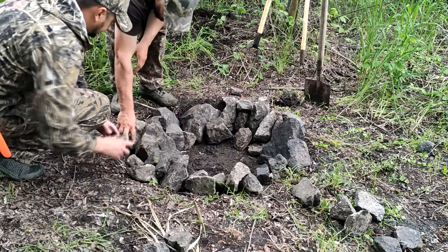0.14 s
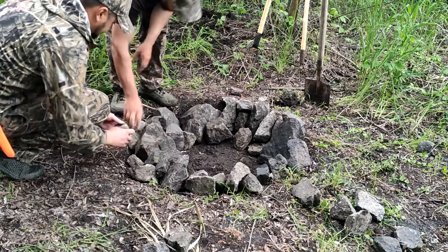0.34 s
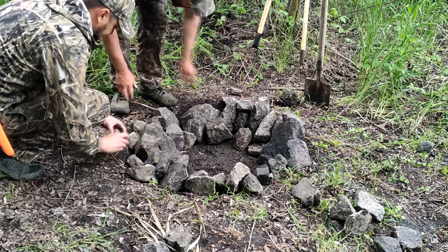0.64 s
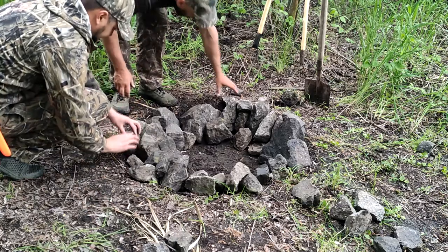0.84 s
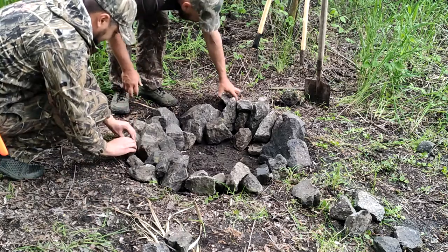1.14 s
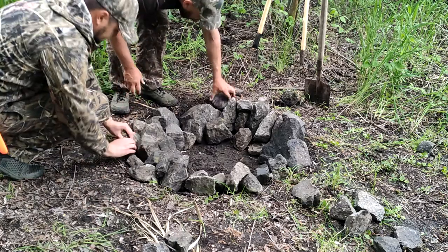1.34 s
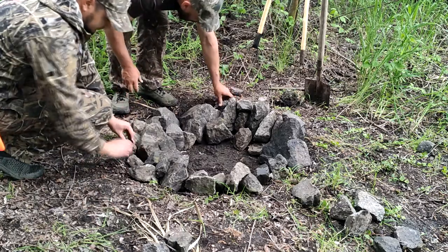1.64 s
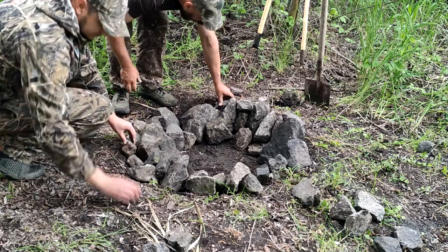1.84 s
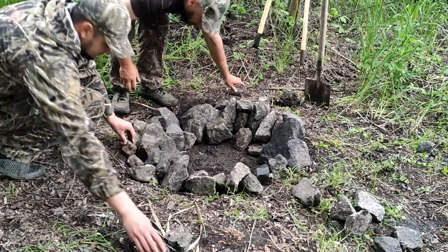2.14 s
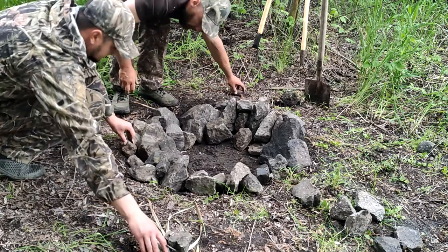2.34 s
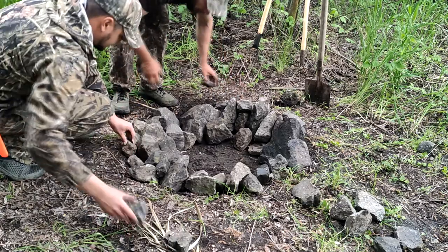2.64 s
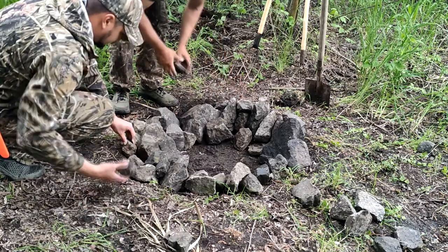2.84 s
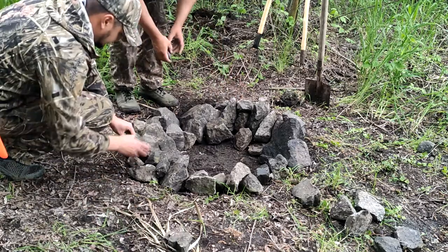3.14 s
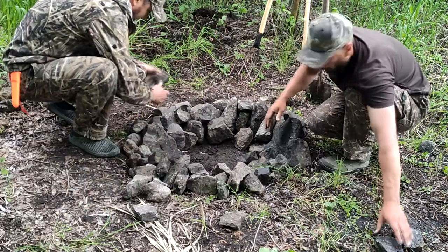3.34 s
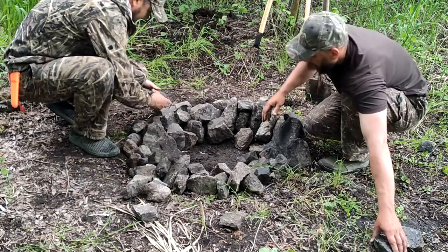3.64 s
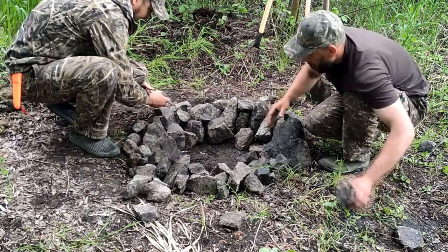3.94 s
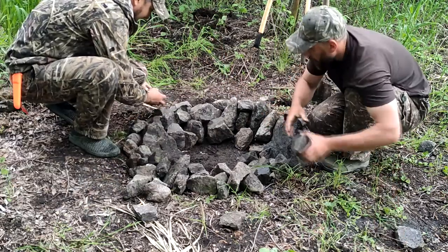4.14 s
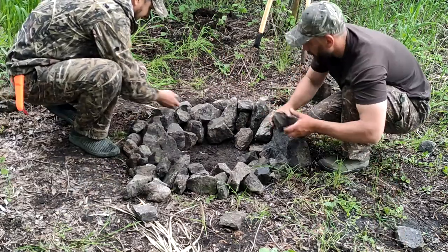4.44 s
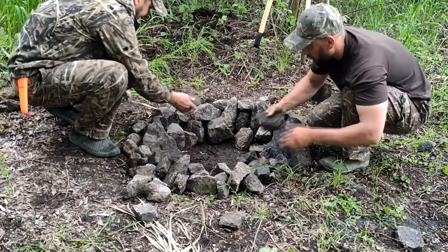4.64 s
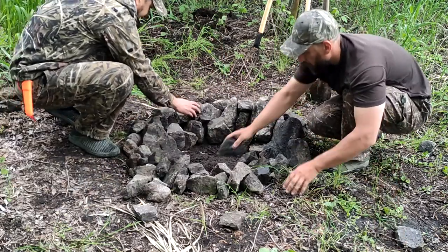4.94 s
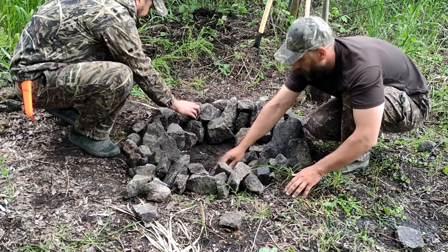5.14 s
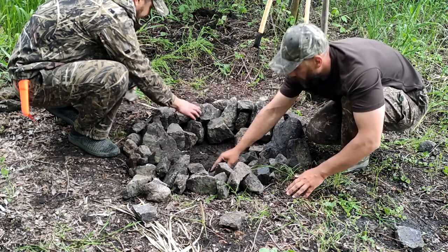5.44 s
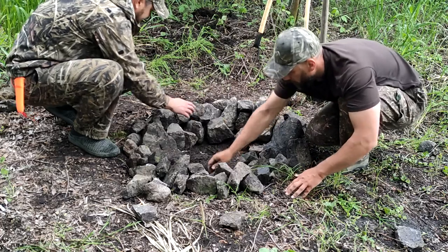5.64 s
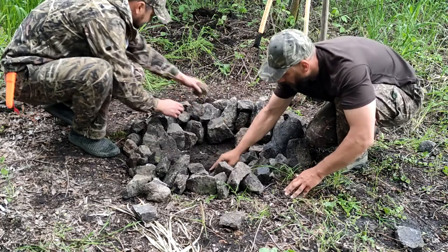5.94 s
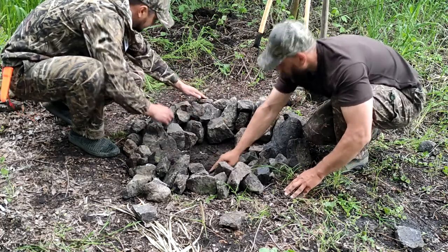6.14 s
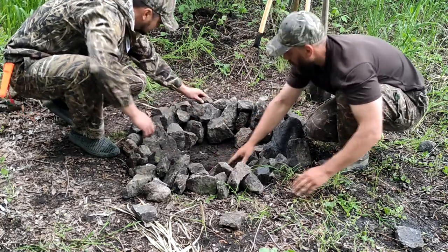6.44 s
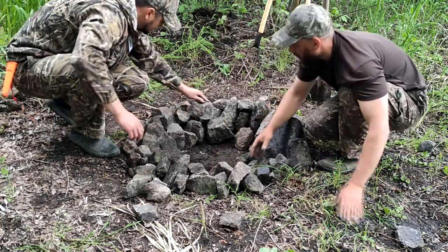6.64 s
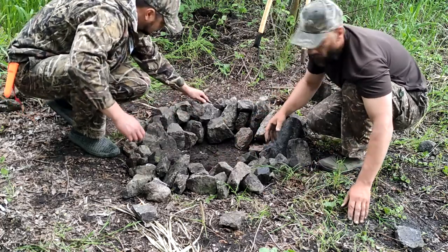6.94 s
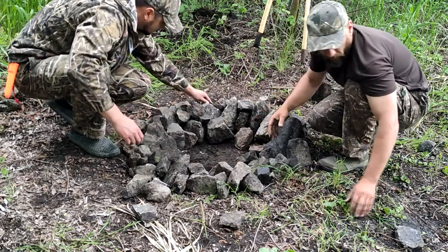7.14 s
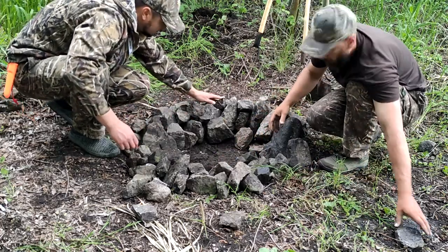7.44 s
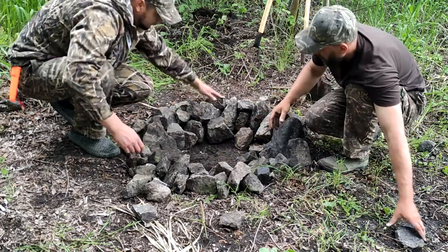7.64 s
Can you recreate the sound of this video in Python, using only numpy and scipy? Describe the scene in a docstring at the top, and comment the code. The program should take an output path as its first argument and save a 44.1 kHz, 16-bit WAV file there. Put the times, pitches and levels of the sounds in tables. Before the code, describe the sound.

Over a quiet outdoor hush, distant birds chirp while heavy stones knock together in uneven bouts, one sharp clatter, then fainter knocks and scrapes.

```python
"""Outdoors, over a quiet hush and fine rustling, a distant bird chirps and others twitter as rocks begin to knock.
Rocks for a fire ring clatter in two bouts in the first two seconds; after a pause come lighter knocks and a scrape.
Then the hardest clatter rings out, a rock drops on the soil and is dragged, and knocks and scrapes grow fainter.
Each knock is a short dull ring of filtered impulses, thrown back by ground, stones and trees as noise tails;
scrapes and rustle are coloured random grains, soil thumps low filtered bursts, birds gliding sines."""
import sys
import numpy as np
from scipy import signal
from scipy.fft import rfft, irfft, next_fast_len
from scipy.io import wavfile
from scipy.ndimage import uniform_filter1d, map_coordinates

SR = 44100
rng = np.random.default_rng(int(sys.argv[2]) if len(sys.argv) > 2 else 0)


def generate_wav(signal):
    """Clip the signal to [-1, 1] and save it as 16-bit WAV at the path in sys.argv[1]."""
    frames = np.transpose(np.atleast_2d(signal))
    scaled = np.clip(frames, -1, 1) * 32767
    pcm = np.round(scaled).astype(np.int16)
    wavfile.write(sys.argv[1], SR, pcm)


N = 343528
SIZE = 4096  # samples in one short sound
HZ = np.fft.rfftfreq(SIZE, 1 / SR)
TIME = np.arange(N) / SR

# drags of a rock into its seat: start t/s, length/s, rasp level/dB, soil scuff level/dB, soil rumble level/dB
SCRAPE_STROKES = [(3.636, 0.05, -68.5, -80, -71), (4.83, 0.062, -55, -65, -59),
                  (5.036, 0.43, -74.5, -70.5, -61.5), (5.438, 0.32, -80, -72, -60.5),
                  (6.536, 0.043, -52, -63, -64), (6.611, 0.11, -66.5, -63, -63),
                  (6.715, 0.098, -65.5, -59.5, -62), (7.035, 0.06, -58, -57.5, -59.5)]
# colour of the soil under a weight: f/Hz, relative level/dB
SOIL_COLOUR = [(30, -29), (60, -14), (90, 6), (115, -3), (160, 0), (210, -4), (300, -32), (700, -40),
               (2000, -92.5)]


def amp(db):
    """Decibels to an amplitude factor."""
    return 10 ** (np.asarray(db) / 20)


def unit(x):
    """The signal or response brought to rms 1."""
    return x / np.sqrt(np.mean(x ** 2) + 1e-20)


def along(points, hz):
    """A curve through (f/Hz, value) points, straight on a log frequency axis."""
    f, v = np.transpose(points)
    return np.interp(np.log(hz + 1), np.log(f), v)


def filtered(x, response):
    """The signal with its spectrum multiplied by a response of frequency."""
    n = x.shape[-1]
    m = next_fast_len(n + 2 * SIZE)
    spectrum = rfft(x, m) * response(np.fft.rfftfreq(m, 1 / SR))
    return irfft(spectrum, m)[..., :n]


def coloured(x, colour):
    """The signal through a (f/Hz, level/dB) colour, at rms 1."""
    return unit(filtered(x, lambda hz: amp(along(colour, hz))))


def causal(gain):
    """The sharpest causal response with this gain: the cepstrum is folded onto positive time."""
    cepstrum = irfft(np.log(gain + 1e-6))
    cepstrum[1:SIZE // 2] *= 2
    cepstrum[SIZE // 2 + 1:] = 0
    return np.exp(rfft(cepstrum))


def add(track, s, sound):
    """Mix a sound into the track at time s."""
    part = track[:, max(round(s * SR), 0):][:, :sound.shape[-1]]
    part += sound[..., :part.shape[1]]


def pair(alike, size):
    """Two noises whose left-right likeness follows (f/Hz, likeness) points, clipped to 0-1."""
    def turn(hz):
        return np.arccos(np.clip(along(alike, hz), 0, 1)) / 2

    def mid_and_side(hz):
        return np.array([np.cos(turn(hz)), np.sin(turn(hz))])

    mid, side = filtered(rng.standard_normal((2, size)), mid_and_side)
    return np.array([mid + side, mid - side])


def burst(t60, attack):
    """A dense cloud of reflections that swells over attack s and dies by 60 dB in t60 s, of energy 1."""
    t = np.arange(SIZE) / SR
    envelope = amp(-60 * t / t60) * (1 - np.exp(-(t / attack) ** 2))
    cloud = pair([(1000, 0.94), (3000, 0.264), (8000, 0.11)], SIZE) * envelope
    return unit(cloud) / np.sqrt(SIZE)


def grains(rate, alike):
    """Random tiny impulses of uneven size, rate a second, in two ears."""
    hits = (rng.random(N) < rate / SR) * np.sqrt(rng.exponential(size=N))
    return hits * pair([(1000, alike)], N)


def wobble(rate):
    """A smooth random curve, rate knots a second."""
    return map_coordinates(rng.standard_normal(int(N * rate / SR) + 4), [TIME * rate])


def stones():
    """Every contact rings and crushes grit, and is thrown back by the ground, the other stones and the trees."""
    # knocks of stone on stone: t/s, clack energy/dB, clack pitch f/Hz, top of the blow f/Hz,
    # thud over clack/dB, bite over clack/dB
    contacts = [(0.2546, -36, 1620, 2600, -5.5, -7), (0.7505, -29.5, 1700, 2400, -12, -16),
                (.907, -10, 1460, 3100, -3.5, -18), (0.9219, -10.5, 1550, 3100, -3, -7),
                (0.9319, -9, 1240, 2400, -7, -24), (0.9499, -20.5, 1290, 2400, 2, -18),
                (0.9875, -34.5, 1150, 2200, 8, -18), (1.4803, -14.5, 1600, 2670, -5, -25),
                (1.5075, -12, 1560, 1980, -2.5, -24), (1.5693, -29, 1500, 2100, 3.5, -18),
                (3.697, -38.5, 1150, 2600, -3, -14), (3.717, -39, 2100, 2600, -3, -15),
                (3.735, -40.5, 2200, 2600, -5, -12), (3.98, -25.5, 1400, 2600, -12, -20),
                (4.809, -6, 1500, 2500, -14, -13.5), (4.827, -3, 1380, 2500, -17, -23),
                (4.8375, 7, 1450, 2520, -6, -13.5), (4.8617, -11, 1410, 2400, -10, -30),
                (4.8732, -13, 1420, 2400, -22, -28), (4.8907, -30, 1200, 2400, -7, -22),
                (4.9035, -15.5, 1430, 2400, 2, -15), (4.9063, -15, 1400, 2400, -11, -21),
                (4.929, -24, 1300, 2400, -9, -22), (4.9385, -18, 1220, 2200, 5.5, -20),
                (4.9603, -19.5, 1274, 2200, 5, -22), (5.16, -26, 1510, 2400, -7, -11),
                (5.1621, -8, 1130, 2400, -4.5, -20), (5.1712, -20.5, 1210, 2400, 2, -19),
                (5.4501, -26.5, 1470, 2600, 1, -8), (5.4575, -43, 950, 1500, 17.5, -23),
                (5.504, -43.5, 950, 1500, 8, -25), (5.622, -40, 1000, 1400, 3, -25),
                (5.629, -34.5, 1150, 1450, -1, -25), (6.0234, -40.5, 1050, 1510, 11.5, -17.5),
                (6.0537, -2, 1704, 2400, -23.5, -13), (6.5412, -20, 2030, 2800, -3, -0.5),
                (6.5586, -24.5, 1402, 2210, -0.5, -16), (6.564, -23, 1950, 2600, -12, -7),
                (6.6782, -21.5, 1590, 2400, -15, -22), (6.714, -19, 1680, 2400, -11, -27),
                (6.727, -28, 1550, 2300, -1, -20), (6.741, -34, 1700, 2700, 0, -12),
                (6.75, -32, 1600, 2300, -1, -17), (6.815, -37, 1650, 2400, -2, -14),
                (7.0364, -34, 1650, 2000, 0, -15), (7.0534, -30.5, 1600, 2200, -9.5, -28),
                (7.104, -31.5, 1560, 2100, 1, -17), (7.523, -43, 2200, 3200, -15, -2),
                (7.731, -38.5, 1300, 1800, -1.5, -27)]
    # where a rock is being set: t/s, clack width setting/Hz, snap pitch f/Hz, snap spread (1 = usual),
    # grit over bite/dB, top of the grit f/Hz, right-ear lag/s, ground echo delay/s, ground echo share,
    # scatter off other stones/dB, trees/dB
    places = np.array([(.92, 860, 3420, 1.1, -2.5, 19000, 0.00012, 0.003, 0.49, -5.5, -12),
                       (1.5, 710, 3500, 1.8, 0.5, 11500, .000023, .0024, 0.26, -9.5, -10),
                       (3.9, 1000, 4000, 1, -6, 12000, .00002, .00172, .7, -9, -9),
                       (4.84, 716, 3220, 1.1, -22.5, 12000, 0.000044, 0.0017, 0.37, -10.5, -16.5),
                       (5.16, 537, 3240, 0.52, 10.5, 12300, 0.000038, 0.0037, 0.12, -2.5, -10.5),
                       (5.5, 890, 2420, 0.26, -15, 11000, .000012, 0.0014, .2, -7.5, -5.5),
                       (6.05, 437, 4270, 0.5, -12.5, 9300, 0.000016, 0.00115, 0.12, -10, -11),
                       (6.55, 980, 3700, 0.97, -26, 11000, 0.0000098, 0.0025, 0.11, -5.5, -6),
                       (6.75, 557, 2590, .8, 3.5, 11000, .000012, .002, 0.19, -3, -8.5)])
    # colour of crushed grit: f/Hz, relative level/dB
    grit_colour = [(3000, -42.5), (5500, -12.5), (6500, -5), (7500, -25), (8700, -1.5), (9700, -5),
                   (10500, 0.5), (11200, -13), (12700, 1), (15500, -6), (18000, -41.5)]
    out = np.zeros((2, N))
    # the trees face every side of a rock, so they also return a broader band than the direct ring
    broad_band = 1 / np.sqrt((1 + (HZ / 3700) ** 10) * (1 + (600 / (HZ + 1)) ** 4))
    broad = irfft(causal(unit(broad_band)))
    for s, db, pitch, blow_hz, thud_db, bite_db in contacts + catches():
        nearest = places[np.argmin(abs(places[:, 0] - s))]
        _, width, snap_hz, snap_spread, grit_db, grit_hz, lag, delay, share, scatter_db, trees_db = nearest
        ears = np.exp(-2j * np.pi * HZ * np.array([[0], [abs(lag)]]))
        ring = stone_ring(pitch, width, blow_hz, thud_db, bite_db, snap_hz, snap_spread) * ears
        # the harder the bite, the brighter the snap and the more grit is crushed, over a few milliseconds
        grain = unit(amp(along(grit_colour, HZ)) / np.sqrt(1 + (HZ / grit_hz) ** 10))
        grit = amp(bite_db + grit_db) * causal(grain) * rfft(burst(t60=0.0034, attack=0.00021))
        ground = (1 + share * np.exp(-2j * np.pi * HZ * delay)) / np.sqrt(1 + share ** 2)
        scatter = amp(scatter_db) * rfft(burst(t60=0.027, attack=0.0019))
        # soft soil swallows the grit's treble, so only the ring bounces off it
        hit = amp(db) * irfft(ring * (ground + scatter) + grit * (1 + scatter))
        add(out, s, hit)
        for sent in hit, amp(db - 5.0) * broad[None]:
            add(out, s, amp(trees_db) * signal.fftconvolve(sent, trees(), axes=1))
    return out


def stone_ring(pitch, width, blow_hz, thud_db, bite_db, snap_hz, snap_spread):
    """A rock's heavily damped ring, with a hollow thud below it and a hard snap above it."""
    # colour of the hollow thud: f/Hz, relative level/dB
    thud_colour = [(60, -44), (250, -11), (330, -3), (400, 1), (520, 3), (740, 0), (1000, -1),
                   (2000, -49.5), (4000, -90.5)]
    # colour of the hard snap: multiple of the snap pitch, relative level/dB
    snap_shape = [(.4, -49), (.62, -10.5), (.82, -2.5), (1, -8), (1.13, -5.5), (1.3, -15.5), (1.7, -31),
                  (2.2, -38), (4, -74.5)]
    # a softer blow cuts the ring off lower
    blow = 1 / np.sqrt(1 + (HZ / blow_hz) ** 10)
    # the resonance is 6 dB down across 1.21 times the width setting
    detune = (HZ ** 2 - pitch ** 2) / ((HZ + 1) * width * 1.21)
    clack = unit(blow / (1 + detune ** 2))
    thud = amp(thud_db) * unit(amp(along(thud_colour, HZ)))
    snap_colour = [(snap_hz * ratio ** snap_spread, db) for ratio, db in snap_shape]
    snap = amp(bite_db + 0.5) * unit(amp(along(snap_colour, HZ)))
    return causal(np.sqrt(clack ** 2 + thud ** 2 + snap ** 2))


def catches():
    """A dragged rock catches on edges at uneven moments: faint knocks that grow with the rasp."""
    every_s, over_rasp_db, spread_db = 0.016, 17.5, 5
    pitch_hz, blow_hz, thud_db, bite_db = 1600, 2200, 0, -18
    knocks = []
    for start, length, rasp_db, _, _ in SCRAPE_STROKES:
        count = max(round(length / every_s), 1)
        for k, (when, force, edge) in enumerate(rng.uniform(-1, 1, (count, 3))):
            s = start + length * (k + .5 + when / 2) / count
            energy_db = rasp_db + over_rasp_db + spread_db * force
            knocks.append((s, energy_db, pitch_hz * (1 + 0.11 * edge), blow_hz, thud_db, bite_db))
    return knocks


def pings():
    """Short pings and narrow bands of noise sound with the hard knocks, each around one pitch."""
    # pings, the lowest a rock's own ring: t/s, pitch f/Hz, width/Hz, energy/dB, t60/s
    tones = [(4.828, 13400, 1100, -28, .03), (5.161, 9250, 130, -16, 0.011), (5.161, 4330, 30, -24.5, .025),
             (5.162, 2760, 30, -33, 0.028), (6.054, 1750, 20, -16.5, 0.02)]
    out = np.zeros((2, N))
    t = np.arange(SIZE) / SR
    for s, hz, width, db, t60 in tones:
        # a random walk of the phase widens the tone into a band
        wander = np.cumsum(np.sqrt(2 * np.pi * width / SR) * rng.standard_normal((2, SIZE)), axis=1)
        envelope = amp(-60 * t / t60) * (1 - np.exp(-t / 0.00034))
        ping = np.sin(2 * np.pi * hz * t + wander) * envelope
        ping = amp(db) * unit(ping) / np.sqrt(SIZE)
        add(out, s, ping)
        add(out, s, amp(-5.0) * signal.fftconvolve(ping, trees(), axes=1))
    return out


def soil():
    """The ground takes a rock's weight with a low, soft thump and a short cloud of reflections."""
    # weight landing on the soil: t/s, energy/dB
    thumps = [(0.76, -28), (0.923, -21), (4.839, -23.5), (5.162, -14.5), (5.452, -22), (6.056, -20)]
    out = np.zeros((2, N))
    body = causal(unit(amp(along(SOIL_COLOUR, HZ))))
    for s, db in thumps:
        thump = irfft(body * (1 + amp(-7.5) * rfft(burst(t60=0.075, attack=0.0055))))
        add(out, s, amp(db) * unit(thump) / np.sqrt(SIZE))
    return out


def scrapes():
    """Rough faces catch and slip while a rock is pushed home; the soil scuffs and rumbles under it."""
    # colour of stone rasping on stone: f/Hz, relative level/dB
    rasp_colour = [(150, -9.5), (300, -0.5), (430, -2), (800, 3), (1300, 1), (1600, 1.5), (1760, 11.5),
                   (2000, -24), (2600, -19.5), (12000, -35.5)]
    # colour of the scuffed soil: f/Hz, relative level/dB
    scuff_colour = [(120, -22.5), (280, -5), (430, 5.5), (620, -5.5), (850, -14.5), (1500, -26.5),
                    (4000, -58.5)]
    rasp, scuff, rumble = np.zeros((3, N))
    for s, length, rasp_db, scuff_db, rumble_db in SCRAPE_STROKES:
        stroke = np.exp(-(2 * (TIME - s) / length - 1) ** 4)
        rasp += amp(rasp_db) * stroke
        scuff += amp(scuff_db) * stroke
        rumble += amp(rumble_db) * stroke
    out = rasp * coloured(grains(rate=4800, alike=0.77), rasp_colour)
    out += scuff * coloured(grains(rate=1400, alike=.9), scuff_colour)
    out += rumble * coloured(grains(rate=1800, alike=0.96), SOIL_COLOUR)
    return out


def rustle():
    """Cloth and dry leaves crackle finely all the time, and flare up when an arm sweeps."""
    # quick sweeps of a sleeve or through dry litter: peak t/s, time either side to fall to e^-2/s, level/dB
    brushes = [(1.427, 0.022, -60.5), (2.422, 0.018, -62), (4.322, 0.13, -63.5), (5.506, 0.059, -62.5),
               (6.119, .012, -61)]
    # colour of dry litter and cloth: f/Hz, relative level/dB
    litter_colour = [(1500, -48), (4000, 3), (7200, -4.5), (9000, 6), (10300, 4), (11400, -18),
                     (13000, 2.5), (15500, -7)]
    level_db = treble_db()
    # the crackle swings 1.8 times as wide in dB as the treble
    stirring = amp(level_db.mean() + 1.8 * (level_db - level_db.mean()))
    sweeps = sum(amp(db) * np.exp(-2 * ((TIME - s) / length) ** 2) for s, length, db in brushes)
    return np.hypot(stirring, sweeps) * coloured(grains(rate=14000, alike=0.15), litter_colour)


def unsteady():
    """A smoothed random curve of rms 1, as long as one short sound."""
    smooth = uniform_filter1d(rng.standard_normal(SIZE), size=180)
    return unit(uniform_filter1d(smooth, size=90))


def bird():
    """Each chirp climbs a little, holds and drops away fast; its overtones flutter and the trees blur it."""
    # chirps: middle t/s, top pitch f/Hz, then the level/dB of the first, second, third and fourth partial
    chirps = [(0.156, 1624, -80, -60.5, -66, -80), (.453, 1812, -71, -56, -64, -70.5),
              (.741, 1710, -67, -63.5, -62, -70), (1.139, 1680, -76, -63.5, -59, -67),
              (1.538, 1712, -69, -55.5, -59.5, -66), (2.055, 1690, -67, -58.5, -54.5, -67),
              (2.672, 1510, -66, -69, -62.5, -72), (3.177, 1580, -62.5, -68, -59.5, -76)]
    half_s = .0165
    rise, fall, waver = .1, 0.21, 0.0075  # shares of the top pitch
    flutter_db, upper_db_per_partial = 2.5, -3  # the slope runs from the fourth partial to the sixth
    out = np.zeros((2, N))
    t = np.arange(SIZE) / SR - SIZE / SR / 2
    u = np.clip(t / half_s, -1.5, 1.5)
    sag = np.where(u < 0, rise * u ** 2, fall * abs(u) ** 2.5)
    for s, top_hz, *low_db, upper_db in chirps:
        phase = 2 * np.pi * np.cumsum(top_hz * (1 - sag + waver * unsteady())) / SR
        partials_db = low_db + [upper_db + upper_db_per_partial * k for k in range(3)]
        voice = np.zeros(SIZE)
        for k, db in enumerate(partials_db, 1):
            voice += amp(db + flutter_db * unsteady()) * np.sin(k * phase)
        chirp = voice * np.exp(-u ** 6)
        add(out, s + t[0], chirp)
        add(out, s + t[0], amp(-4.5) * signal.fftconvolve(chirp[None], trees(), axes=1))
    return out


def twitter():
    """Far birds slip thin gliding notes through the trees, whose tail is sent louder than the note."""
    # notes: middle t/s, middle pitch f/Hz, glide/(Hz/s), level/dB ahead of the direct and tree sends
    notes = [(.397, 3440, 11000, -65), (.512, 4100, 6000, -64), (.895, 3600, 13000, -65),
             (.995, 4160, -9000, -66), (1.675, 4320, -16000, -68),]
    note_s = .018  # from the middle to 1/e
    out = np.zeros((2, N))
    t = (np.arange(SIZE) - SIZE / 2) / SR
    for s, hz, glide, db in notes:
        phase = 2 * np.pi * np.cumsum(hz + glide * t) / SR
        note = amp(db) * np.sin(phase) * np.exp(-(t / note_s) ** 2)
        add(out, s + t[0], amp(-2) * note)
        add(out, s + t[0], amp(4) * signal.fftconvolve(note[None], trees(), axes=1))
    return out


def trees():
    """A fresh faint tail from trunks and bushes, of energy 1: noise that dies at its own pace in each band."""
    # decay: f/Hz, t60/s
    decay = [(150, 0.27), (600, 0.21), (1500, 0.18), (4000, 0.21), (10000, 0.23)]
    # colour of the tail: f/Hz, relative level/dB
    tail_colour = [(150, 1.5), (600, -1), (1500, -3), (3500, 1), (10000, 3)]
    noise = pair([(400, 0.97), (1500, 0.2), (4000, 0.13)], SR // 3)
    hz, t, z = signal.stft(noise, SR, nperseg=256)
    swell = 1 - np.exp(-t / 0.0069)
    fade = amp(along(tail_colour, hz)[:, None] - 60 * t / along(decay, hz)[:, None])
    tail = signal.istft(z * swell * fade, SR, nperseg=256)[1]
    return unit(tail) / np.sqrt(tail.shape[1])


def treble_db():
    """The level of the treble, one value per sample, gliding straight between points."""
    # treble: t/s, level/dB
    treble = [(0.0, -73), (0.63, -74.5), (1.11, -73), (1.82, -74.5), (2.97, -74.5), (3.73, -70.5),
              (3.97, -72), (5.88, -72), (6.25, -70), (6.44, -72), (7.27, -73.5), (7.79, -72)]
    return np.interp(TIME, *np.transpose(treble))


def hush():
    """Distant rumble and foliage drift slowly at random; a fine hiss follows the treble level."""
    # colour of the outdoor air: f/Hz, relative level/dB
    air_colour = [(15, -69), (25, -50), (61, -7.5), (120, -3), (157, -6.5), (414, -10.5), (513, -13.5),
                  (791, -15.5), (857, -16.5), (929, -17), (1640, -20.5), (3300, -19.5), (7030, -28.5),
                  (10300, -28.5), (15800, -35.5)]
    # stereo width of the air: f/Hz, left-right likeness (below 0 counts as 0)
    air_alike = [(60, 0.7), (130, 0.62), (290, 0.51), (640, 0.19), (1410, -0.31), (3100, 0.1),
                 (6820, 0.022), (15000, -0.2)]
    rumble_db, foliage_db, drift_db = -62.5, -65.5, .5

    def low(hz):
        return 1 / (1 + (hz / 900) ** 2)

    def high(hz):
        return 1 - 1 / (1 + (hz / 7000) ** 8)

    air = filtered(pair(air_alike, N), lambda hz: amp(along(air_colour, hz)))
    rumble = amp(rumble_db + drift_db * wobble(rate=1.97)) * unit(filtered(air, low))
    middle = unit(filtered(air, lambda hz: 1 - low(hz) - high(hz)))
    foliage = amp(foliage_db + drift_db * wobble(rate=1)) * middle
    hiss = amp(treble_db() + 0.5) * unit(filtered(air, high))
    return rumble + foliage + hiss


def scene():
    """All layers, from the stones to the hush."""
    return stones() + pings() + soil() + scrapes() + rustle() + bird() + twitter() + hush()


def record(dry):
    """A steep low-pass: the treble ends in a 200 Hz wide ramp around the band limit."""
    top_hz = 15780
    return filtered(dry, lambda hz: np.clip((top_hz - hz) / 200 + .5, 0, 1))


dry = scene()
out = record(dry)
generate_wav(out)
```